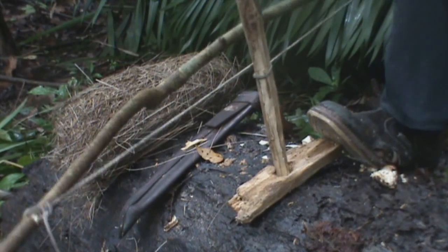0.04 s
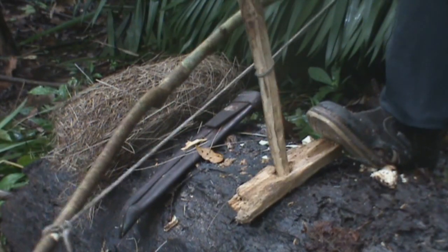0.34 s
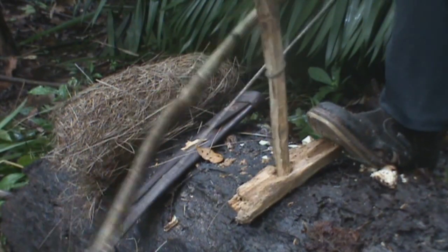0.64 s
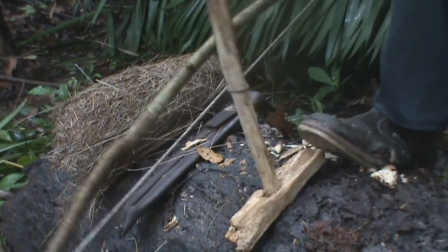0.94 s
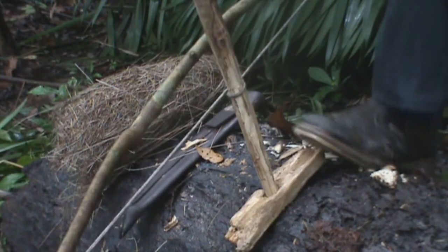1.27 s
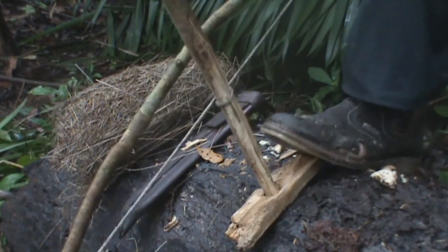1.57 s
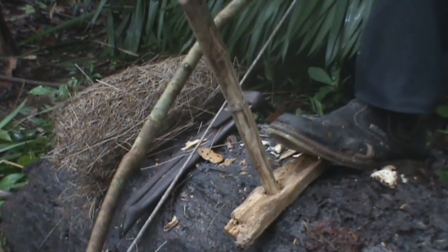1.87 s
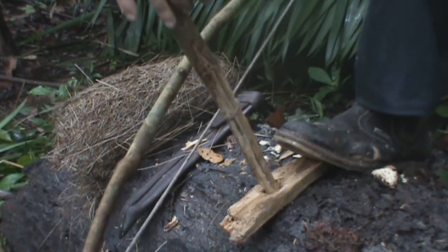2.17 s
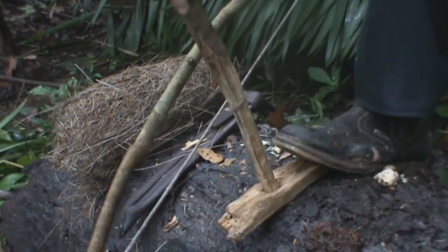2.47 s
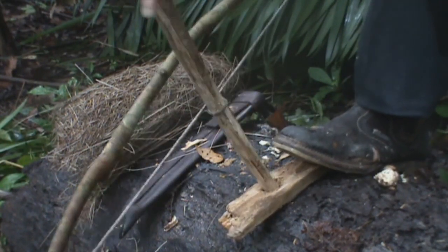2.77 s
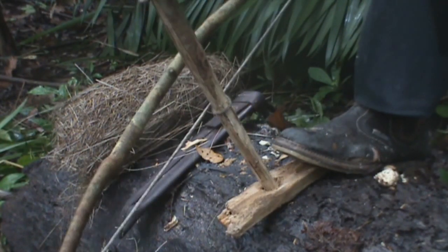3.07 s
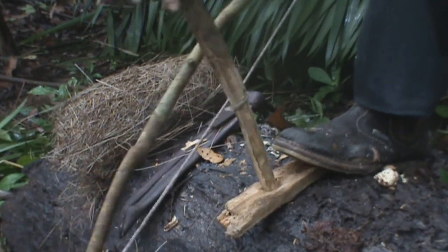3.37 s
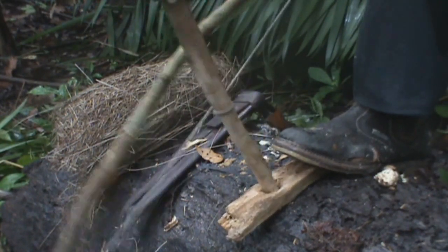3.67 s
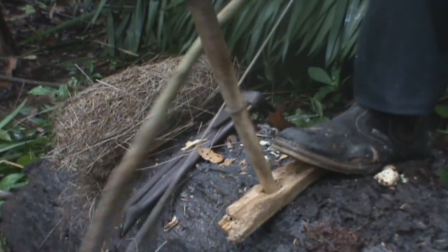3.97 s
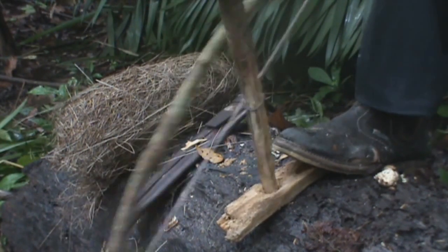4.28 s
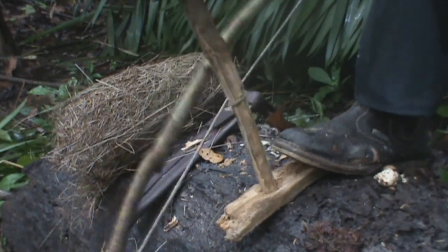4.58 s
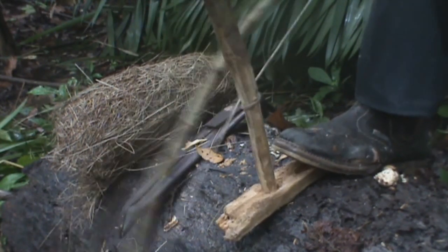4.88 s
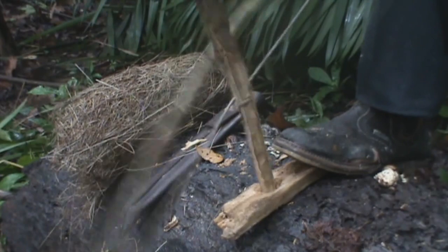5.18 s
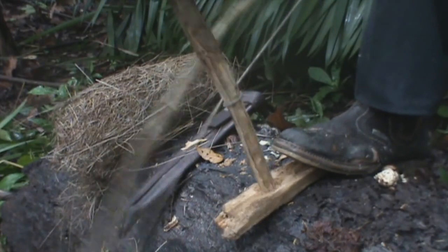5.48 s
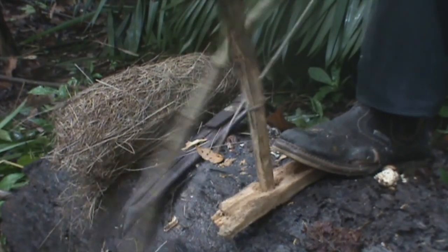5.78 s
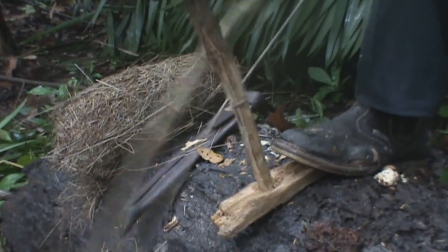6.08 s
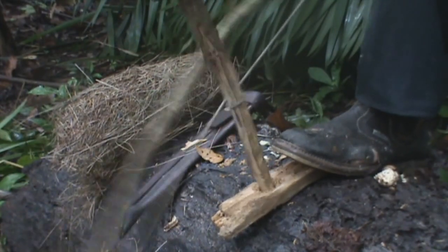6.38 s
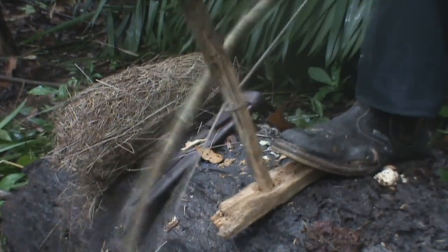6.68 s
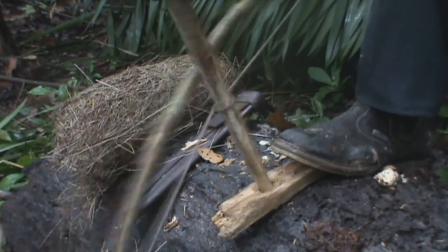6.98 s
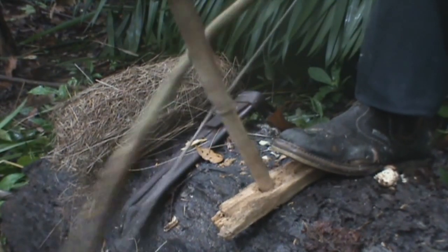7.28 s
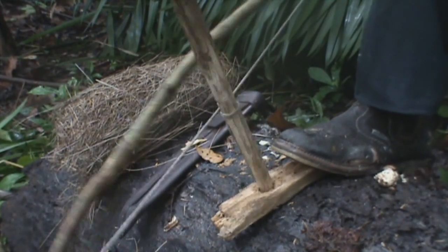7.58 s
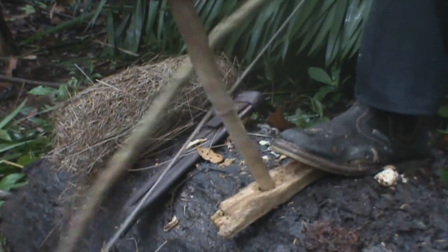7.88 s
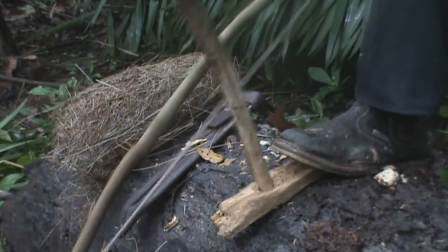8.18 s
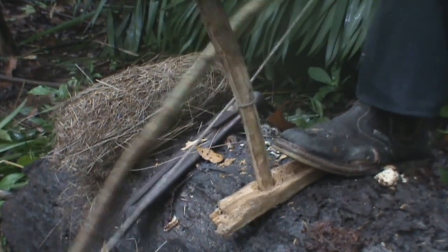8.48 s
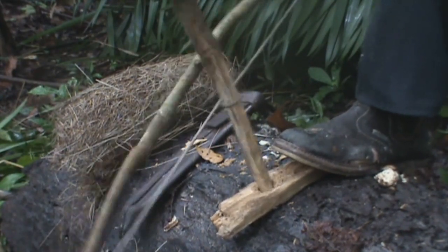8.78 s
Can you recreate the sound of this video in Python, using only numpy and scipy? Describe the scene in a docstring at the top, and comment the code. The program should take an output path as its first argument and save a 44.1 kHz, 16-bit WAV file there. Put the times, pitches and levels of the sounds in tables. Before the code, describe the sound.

An insect trills shrilly over soft hiss as a bow drill starts rasping rapidly against a board, its cord occasionally snapping.

```python
"""Outdoors among plants, a bow drill works a wooden board. A few scrapes seat the spindle and a boot scuffs,
then the bow settles into quick to-and-fro strokes: the tip rasps in its socket and the cord now and then
snaps on the wood. Two faint, thin squeaks sound, one with the scuff and one late in the bowing.
A near insect scrapes its wings in paired chirps; when it stops, farther chirps continue briefly.
Under it all lie a distant insect chorus, a wide, soft hiss and a faint electronic whine."""
import sys
import numpy as np
from scipy import signal
from scipy.fft import rfft, irfft, next_fast_len
from scipy.io import wavfile

SR = 44100
rng = np.random.default_rng(int(sys.argv[2]) if len(sys.argv) > 2 else 0)


def waveform_to_disk(signal):
    """Save audio, clipped to [-1, 1], as 16-bit WAV at the path in sys.argv[1]."""
    frames = np.transpose(np.atleast_2d(signal))
    scaled = np.clip(frames, -1, 1) * 32767
    samples = np.round(scaled).astype(np.int16)
    wavfile.write(sys.argv[1], SR, samples)


N = 394254
TIME = np.arange(N) / SR
FFT_SIZE = next_fast_len(N, True)
FREQS = np.maximum(np.arange(FFT_SIZE // 2 + 1) * SR / FFT_SIZE, 1)

# bow strokes at their fastest, push and pull in turn: t/s, relative level/dB
BOW_STROKES = [(3.858, -45.5), (4.038, -44.5), (4.28, -44), (4.435, -48), (4.64, -46), (4.768, -44),
               (4.95, -44), (5.075, -44.5), (5.241, -45), (5.39, -45.5), (5.541, -42.5), (5.7, -44),
               (5.856, -43.5), (5.992, -46), (6.146, -45.5), (6.285, -45), (6.454, -43), (6.592, -44.5),
               (6.748, -43.5), (6.874, -43), (7.031, -42.5), (7.154, -42.7), (7.315, -44), (7.413, -40),
               (7.582, -42.5), (7.683, -41.5), (7.845, -43), (7.961, -42.5), (8.108, -42.5), (8.213, -42),
               (8.363, -43.5), (8.47, -42.5), (8.628, -45), (8.736, -42.5), (8.876, -42.5), (8.98, -40.5)]
# how hard the arm drives the bow: t/s, effort/0-1
ARM_EFFORT = [(3.8, 0), (6.2, 0.23), (6.8, 0.95), (8.9, 1)]
# scrapes as the spindle is seated by hand: fastest t/s, rise/s, stop/s, relative level/dB
SEATING_SCRAPES = [(0.0, .08, .2, -46.5), (1.085, 0.19, 0.028, -43.5), (1.886, 0.019, .039, -53),
                   (2.896, .082, .08, -52), (3.568, .095, 0.047, -46.5)]
# gritty hiss of fibres tearing in the socket: f/Hz, relative level/dB
GRIT_EQ = [(2000, -6), (5500, -3.5), (8300, 1.5), (9100, 3.5), (9700, 6.5), (10400, 5), (11800, 6.5),
           (13200, 7.5), (14300, 5.5), (15400, -1)]
# bright ring of spindle and board: f/Hz, width/Hz, relative level/dB
WOOD_MODES = [(1930, 330, -20), (2983, 620, -1.5), (3900, 320, 0.5), (4920, 820, 1.5), (6160, 450, -4),
              (7320, 1800, -5)]
# low body of the board, pressed to the ground: f/Hz, width/Hz, relative level/dB
SLAB_MODES = [(178, 50, -3), (433, 130, 1.5), (736, 190, -3), (1005, 190, -7.5), (1840, 460, -6.5)]
# stereo image of the drill: f/Hz, left-right likeness/0-1, left lead/rad
DRILL_IMAGE = [(400, 1, 1.4), (1440, 1, 0.83), (3500, 0.69, 0.57), (5000, 0.61, 0.69), (8000, 1, 0.29),
               (10000, 0.87, .1), (13000, 0.98, .02)]
# cord and spindle snapping and letting go: t/s, relative level/dB, brightness/dB
CORD_SNAPS = [(0.019, -20.5, -11.5), (1.0616, -31.5, -2), (1.0914, -35, -2), (3.4955, -27, -11),
              (4.2097, -22, -6), (4.2258, -5.5, -13.5), (4.2335, -18, -6), (4.5387, -23, -24),
              (6.6645, -23.5, -20), (6.8516, -21.5, -13), (7.1537, -16, -9.5), (7.4204, -22, -24),
              (7.8413, -20, -23), (7.9609, -14, -11), (8.3597, -19.5, -19), (8.626, -21.5, -20),
              (8.739, -18, -9.5)]
# the boot shifting on the board: t/s, level/dB
BOOT_ENVELOPE = [(1.95, -90), (2.04, -60), (2.10, -45), (2.17, -53.5), (2.30, -65), (2.45, -90)]
# dull tone of the sole: f/Hz, relative level/dB
BOOT_EQ = [(300, -12), (900, 4), (1300, 2), (2400, 2), (3200, 1), (4000, -13), (9000, -21)]
# faint, thin squeaks: start t/s, end t/s, f/Hz, level of the fundamental/dB
SQUEAK_NOTES = [(2.05, 2.16, 6750, -51.5), (7.42, 7.547, 5540, -52)]
# insect phrases, the last running on into faint, farther chirps: start t/s, end t/s
SONG_PHRASES = [(0.016, 1.73), (1.775, 1.85), (1.88, 1.95), (2.024, 3.0), (3.078, 3.34), (3.385, 3.65),
                (3.73, 6.4), (6.445, 6.66), (6.746, 8.24)]
# tones of a chirp, one for each wing: f/Hz, relative level/dB, left minus right/dB
WING_TONES = [(7690, 0, 5.5), (7475, -10.5, 1)]
# the bed of hiss: f/Hz, relative level/dB, left-right likeness/0-1, left lead/rad
HISS_BANDS = [(20, -98.6, 0.17, -0.27), (45, -94.9, 0.54, -0.0), (90, -88.3, 0.57, 0.67),
              (180, -81.2, 0.66, 1.78), (400, -74.4, 0.91, 2.38), (900, -72.6, 0.95, 2.57),
              (1800, -76.9, 0.89, 2.49), (3500, -84.7, 0.74, 2.16), (6300, -91.1, 0.44, 1.37),
              (9500, -95.3, 0.31, 0.35), (12500, -97.6, 0.88, 0.05), (15300, -98.0, 1.0, -0.0)]

SETTLE_FROM_S, SETTLE_TO_S = 1.15, 2.35   # the board ticks and rustles as it settles under the boot


def spindle_rasp(judder_db, judder_per_s, grit_db, wood_db, slab_db, swell, wander_db):
    """Friction swells with speed and rings the wood; the out-of-round tip judders as it turns."""
    grit_level, body_level = np.zeros((2, N))
    for fastest, rise, stop, rub_db, body_db in light_rubs(body_db=-3) + bow_rubs():
        now = slice(max(int((fastest - rise) * SR), 0), int((fastest + stop) * SR))
        speed = np.sin(np.pi / 2 * np.interp(TIME[now] - fastest, [-rise, 0, stop], [0, 1, 0]))
        grit_level[now] += from_db(rub_db + grit_db) * speed ** swell
        body_level[now] += from_db(body_db) * speed ** swell
    grit = rms_one(equalise(grains(per_s=15000, size_db=-0.5), GRIT_EQ))
    friction = grains(per_s=10000, size_db=2.5)
    # the contact wanders round the socket and favours now one resonance, now another
    ring = sum((-1) ** k * resonate(friction, [mode]) * from_db(wander_db * drift(14))
               for k, mode in enumerate(WOOD_MODES))
    slab = resonate(grains(per_s=3000, size_db=1.0), SLAB_MODES)
    body = from_db(wood_db) * rms_one(ring) + from_db(slab_db) * rms_one(slab)
    judder = from_db(judder_db * drift(judder_per_s))
    return widen((grit_level * grit + body_level * body) * judder, DRILL_IMAGE)


def bow_rubs(rise_share=.8, longest_rise_s=.12, push_stop_s=.031, pull_stop_s=.053):
    """Strokes build slowly and stop short: fastest t/s, rise/s, stop/s, grit/dB, body/dB."""
    fastest, db = np.transpose(BOW_STROKES)
    effort = np.interp(fastest, *np.transpose(ARM_EFFORT))
    rise = np.minimum(rise_share * np.diff(fastest, prepend=0), longest_rise_s)
    # a harder arm stops sooner and brings out more wood
    stop = np.resize([push_stop_s, pull_stop_s], len(fastest)) * (1 - .47 * effort)
    body_db = db + .6 + 1.4 * effort
    return list(zip(fastest, rise, stop, db, body_db))


def light_rubs(body_db, rustle_db=-64):
    """The hand seats the spindle and the settling board rustles; columns as in bow_rubs."""
    half = (SETTLE_TO_S - SETTLE_FROM_S) / 2
    rustle = (SETTLE_FROM_S + half, half, half, rustle_db)
    return [(t, rise, stop, db, db + body_db) for t, rise, stop, db in SEATING_SCRAPES + [rustle]]


def cord_snaps(knock_db, thud_db, contact_hz, build_s, rise_s, fall_s, scatter_db):
    """A burst of slips builds and dies in milliseconds: a crack on top, a knock and a thud below."""
    ticks = board_ticks(count=5, db=-36, bright_db=-14)
    catches = cord_catches(full_effort_db=-33, easy_loss_db=4, vary_db=2, bright_db=-19)
    force, crack_level = np.zeros((2, N))
    for t, db, bright_db in CORD_SNAPS + ticks + catches:
        now = slice(max(int(t * SR) - SR // 100, 0), int(t * SR) + SR // 20)
        past_peak = TIME[now] - t - build_s
        burst = from_db(db) * np.exp(np.minimum(past_peak / rise_s, -past_peak / fall_s))
        force[now] += burst
        crack_level[now] += burst * from_db(bright_db)
    slips = rng.choice([-1, 1], (2, N))
    crack = equalise(slips * crack_level, GRIT_EQ)
    # the cord is a soft striker: it favours the lower resonances
    blow = signal.lfilter(*signal.butter(2, contact_hz, fs=SR), slips * (force + 1e-12))
    knock = from_db(knock_db) * resonate(blow, WOOD_MODES)
    thud = from_db(thud_db) * resonate(blow, SLAB_MODES)
    direct = widen(crack + knock + thud, DRILL_IMAGE)
    return direct + from_db(scatter_db) * foliage(direct)


def cord_catches(full_effort_db, easy_loss_db, vary_db, bright_db):
    """The cord catches lightly at the height of each stroke: t/s, level/dB, brightness/dB."""
    catches = []
    for t, _ in BOW_STROKES:
        ease = 1 - np.interp(t, *np.transpose(ARM_EFFORT))
        db = full_effort_db - easy_loss_db * ease + vary_db * rng.standard_normal()
        catches.append((t, db, bright_db))
    return catches


def board_ticks(count, db, bright_db):
    """The board ticks faintly as it settles: t/s, level/dB, brightness/dB."""
    return [(t, db, bright_db) for t in rng.uniform(SETTLE_FROM_S, SETTLE_TO_S, count)]


def boot_scuff():
    """The sole drags on the board in one dull, grainy swell."""
    scuff = rms_one(equalise(grains(per_s=8300, size_db=1.5), BOOT_EQ))
    level = from_db(np.interp(TIME, *np.transpose(BOOT_ENVELOPE)))
    return widen(scuff * level, DRILL_IMAGE)


def squeaks(waver_hz, octave_db):
    """Brief, wavering tones with a weak octave on top."""
    out = np.zeros(N)
    for start, end, hz, db in SQUEAK_NOTES:
        phase = 2 * np.pi * np.cumsum(hz + waver_hz * drift(500)) / SR
        swell = np.sin(np.pi * np.clip((TIME - start) / (end - start), 0, 1))
        out += from_db(db) * swell * (np.sin(phase) + from_db(octave_db) * np.sin(2 * phase))
    return out


def wing_strokes(pairs_per_s, pair_gap_s, jitter_s, chirp_s, near_stops_s, farther_db):
    """Wing strokes swell in pairs; the near insect stops and faint, farther chirps continue briefly."""
    strokes = np.zeros(N)
    for start, end in SONG_PHRASES:
        pairs = np.arange(start, end, 1 / pairs_per_s)
        times = (pairs[:, None] + [0, pair_gap_s]).ravel()
        times = times[times < end]
        loose_times = np.abs(times + jitter_s * rng.standard_normal(len(times)))
        strokes[(loose_times * SR).astype(int)] = from_db(farther_db * (times > near_stops_s))
    past_peak = np.arange(-SR // 50, SR // 50) / SR
    return signal.fftconvolve(strokes, np.exp(-(past_peak / chirp_s) ** 2), "same")


def insect_song(chirps, gain_db, scatter_db, lead_rad, scrape_db, waver_rad):
    """Each stroke sounds both wing tones, blurred by the plants around."""
    out = 0
    for hz, db, pan_db in WING_TONES:
        # uneven teeth on the wing's file make the note waver and scrape
        phase = 2 * np.pi * hz * TIME + waver_rad * drift(60)
        level = chirps * from_db(db) * (1 + from_db(scrape_db) * drift(700))
        direct = level * np.cos([phase + lead_rad, phase])
        pan = from_db([[pan_db / 2], [-pan_db / 2]])
        out = out + pan * (direct + from_db(scatter_db) * foliage(direct[0]))
    return from_db(gain_db) * out


def insect_chorus(hz, width_hz, db):
    """Many distant singers merge into a narrow sizzle."""
    r = np.exp(-np.pi * width_hz / SR)
    poles = [1, -2 * r * np.cos(2 * np.pi * hz / SR), r * r]
    chorus = signal.lfilter([1, 0, -1], poles, rng.standard_normal((2, N)))
    return from_db(db) * rms_one(chorus)


def foliage(x, t60_s=.097):
    """Leaves and ground scatter a short, diffuse tail, different on each side."""
    age = TIME[:SR // 4]
    echoes = rng.standard_normal((2, len(age))) * from_db(-60 * age / t60_s)
    echoes /= np.sqrt(np.sum(echoes ** 2, axis=1, keepdims=True))
    return signal.fftconvolve(np.atleast_2d(x), echoes, axes=1)[:, :N]


def hiss_bed(gain_db):
    """A soft, steady, very wide hiss."""
    bands = np.array(HISS_BANDS)
    white = rng.standard_normal((2, N)) * np.sqrt(SR / 2)   # unit power per Hz
    hiss = equalise(white, bands[:, :2])
    return from_db(gain_db) * widen(hiss, bands[:, [0, 2, 3]])


def electronic_whine(hz, db, flutter_hz, flutter_db):
    """Electronics give off one thin, fluttering tone."""
    flutter = 1 + from_db(flutter_db) * np.sin(2 * np.pi * flutter_hz * TIME)
    return from_db(db) * flutter * np.sin(2 * np.pi * hz * TIME)


def resonate(force, modes):
    """A force rings the damped resonances of the wood, in parallel."""
    out = 0
    for k, (hz, width, db) in enumerate(modes):
        r = np.exp(-np.pi * width / SR)
        poles = [1, -2 * r * np.cos(2 * np.pi * hz / SR), r * r]
        ring = signal.lfilter([1, 0, -1], poles, force + 1e-18) * (1 - r * r) / 2
        out = out + (-1) ** k * from_db(db) * ring
    # little is radiated outside the range of the resonances
    edges = [modes[0][0] * 0.78, min(modes[-1][0] * 1.09, SR / 3)]
    return signal.sosfilt(signal.butter(2, edges, "band", fs=SR, output="sos"), out)


def grains(per_s, size_db):
    """Friction texture: two trains of tiny slips of uneven size."""
    sizes = from_db(size_db * np.minimum(rng.exponential(1, (2, N)), 4))
    return sizes * rng.choice([-1, 1], (2, N)) * (rng.random((2, N)) < per_s / SR)


def drift(per_s):
    """Smooth random modulation with a spread of 1."""
    knots = rng.standard_normal(N // 20)
    return np.interp(TIME * per_s, np.arange(len(knots)), knots) * np.sqrt(3 / 2)


def widen(pair, image):
    """Two unrelated signals become left and right, partly alike and offset in phase."""
    alike, lead = over_hz(image)
    alike = np.clip(alike, 0, 1)
    turn = np.exp(.5j * lead)
    a, b = rfft(pair, FFT_SIZE)
    mid = np.sqrt((1 + alike) / 2) * a
    side = np.sqrt((1 - alike) / 2) * b
    return irfft([(mid + side) * turn, (mid - side) / turn], FFT_SIZE)[:, :N]


def equalise(x, curve):
    """Colour a sound with a smooth EQ curve."""
    return irfft(rfft(x, FFT_SIZE) * from_db(over_hz(curve)[0]), FFT_SIZE)[..., :N]


def over_hz(rows):
    """Draw each column of a table as a curve over log frequency."""
    hz, *columns = np.transpose(rows)
    return [np.interp(np.log(FREQS), np.log(hz), c) for c in columns]


def from_db(db):
    """Decibels to gain."""
    return np.exp(np.asarray(db) * np.log(10) / 20)


def rms_one(x):
    """Scale to unit power."""
    return x / np.sqrt(np.mean(x ** 2) + 1e-20)


def scene():
    """The drill up front, insects around it, hiss and whine behind."""
    drill = spindle_rasp(judder_db=1.5, judder_per_s=130, grit_db=-1.5, wood_db=-3.5, slab_db=-11.5,
                         swell=1.58, wander_db=1.4)
    drill += cord_snaps(knock_db=-4.5, thud_db=-24, contact_hz=6730,
                        build_s=.0015, rise_s=.00053, fall_s=.0018, scatter_db=-11)
    accents = boot_scuff() + squeaks(waver_hz=206, octave_db=-7)
    chirps = wing_strokes(pairs_per_s=19.86, pair_gap_s=.0205, jitter_s=.0009, chirp_s=.0058,
                          near_stops_s=7.77, farther_db=-14)
    insects = insect_song(chirps, gain_db=-43.5, scatter_db=5, lead_rad=.37,
                          scrape_db=-12.5, waver_rad=1.56)
    insects += insect_chorus(hz=7310, width_hz=200, db=-58.5)
    bed = hiss_bed(gain_db=.3) + electronic_whine(hz=15625, db=-60.5, flutter_hz=50, flutter_db=-10)
    return drill + accents + insects + bed


def record(dry):
    """A steep low-pass cuts the top just above the whine."""
    cutoff_hz = 15850
    return signal.sosfilt(signal.ellip(12, .1, 70, cutoff_hz, fs=SR, output="sos"), dry)


dry = scene()
out = record(dry)
waveform_to_disk(out)
```